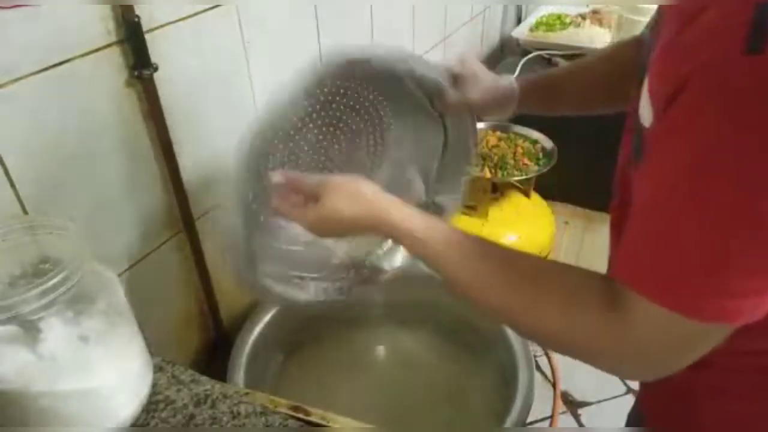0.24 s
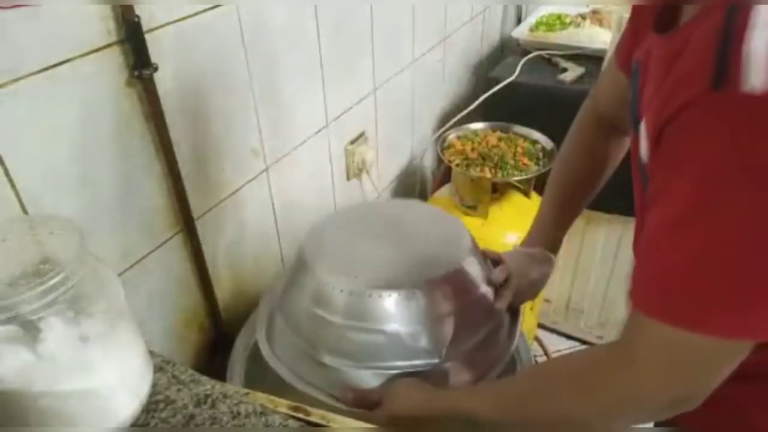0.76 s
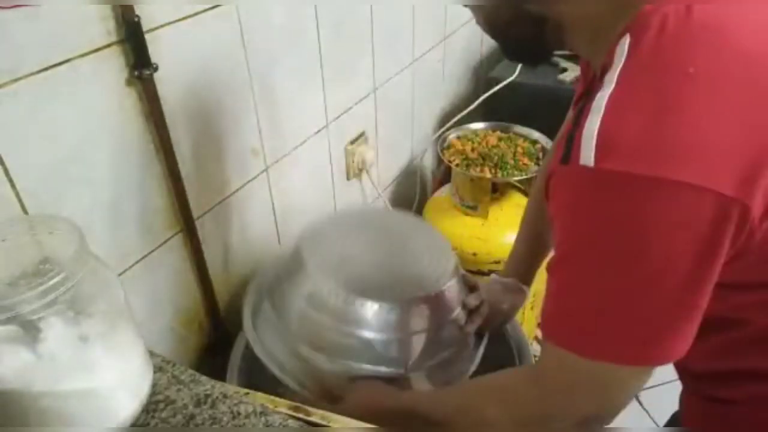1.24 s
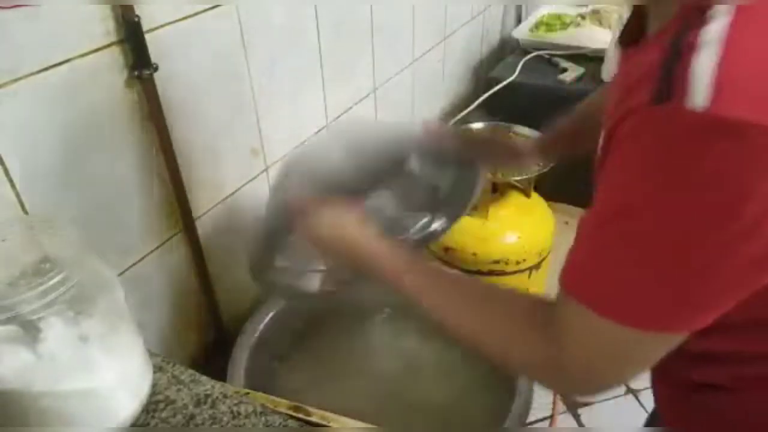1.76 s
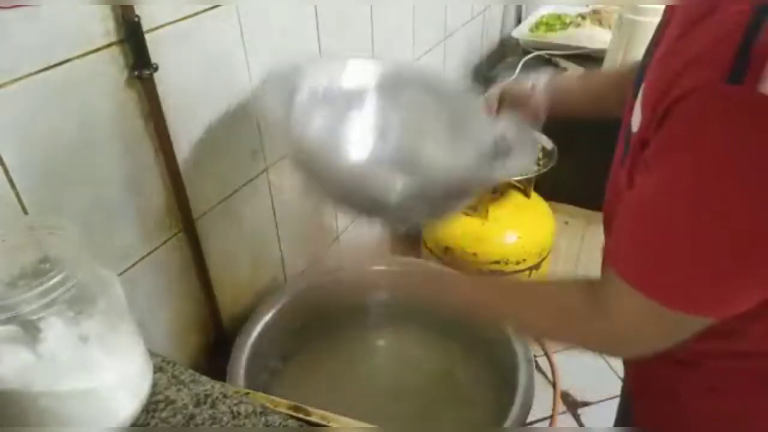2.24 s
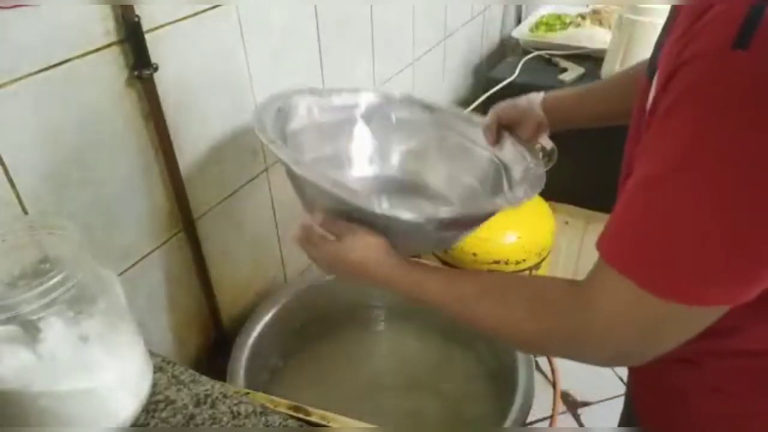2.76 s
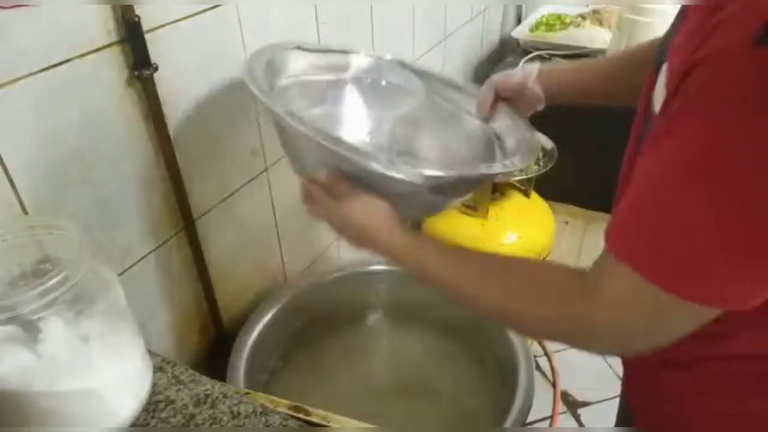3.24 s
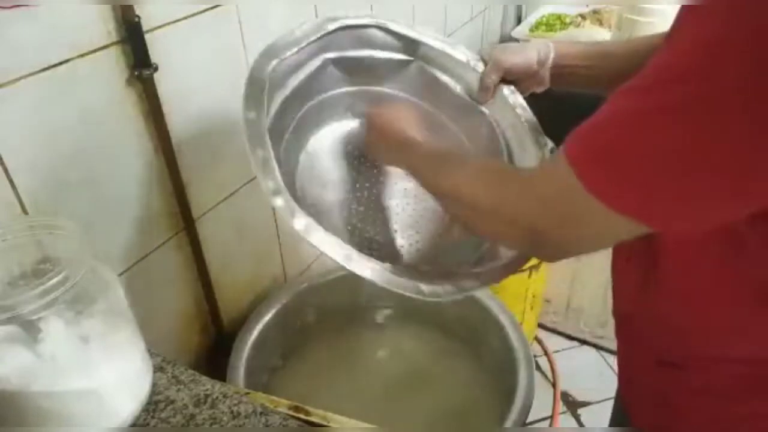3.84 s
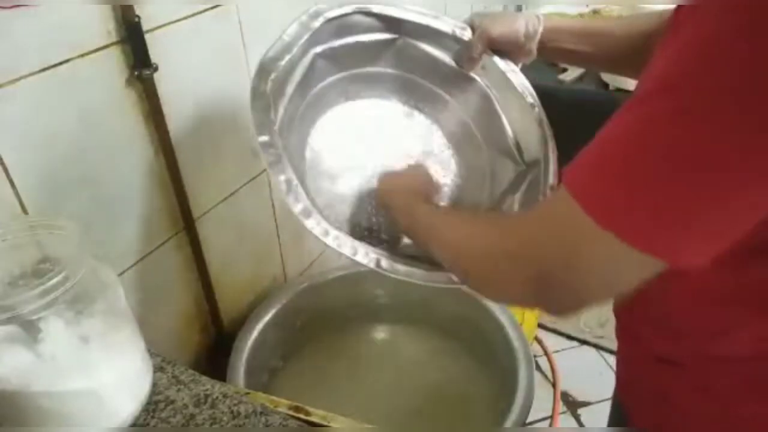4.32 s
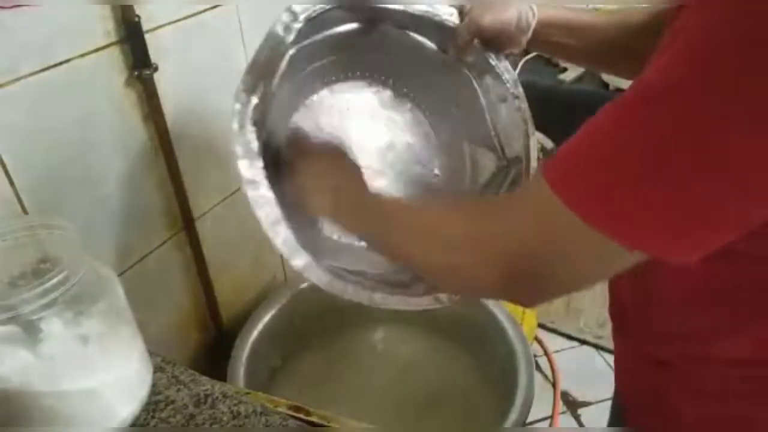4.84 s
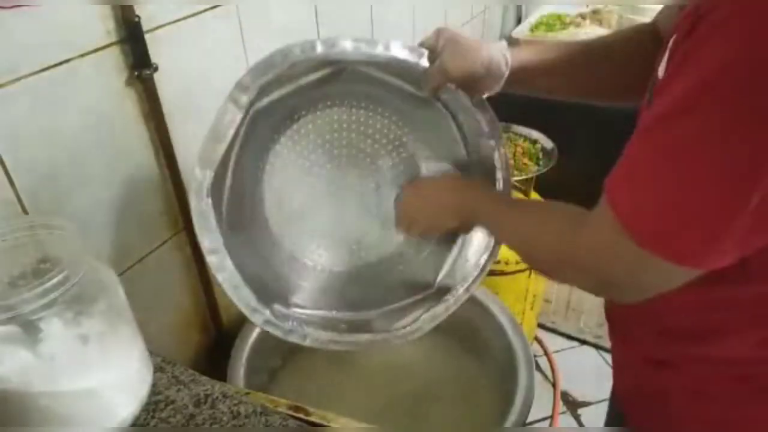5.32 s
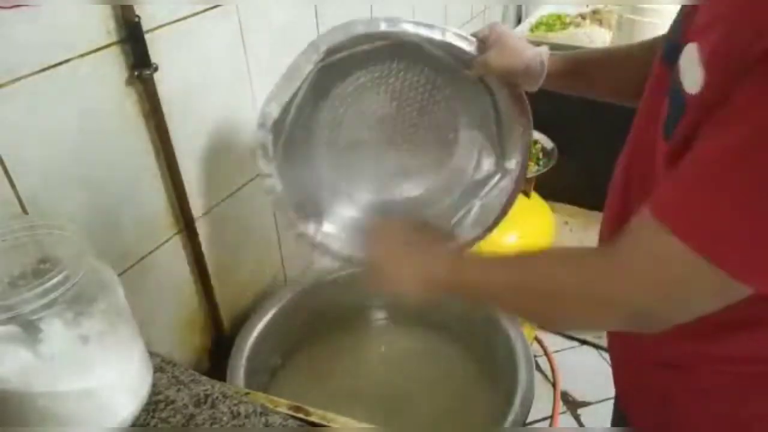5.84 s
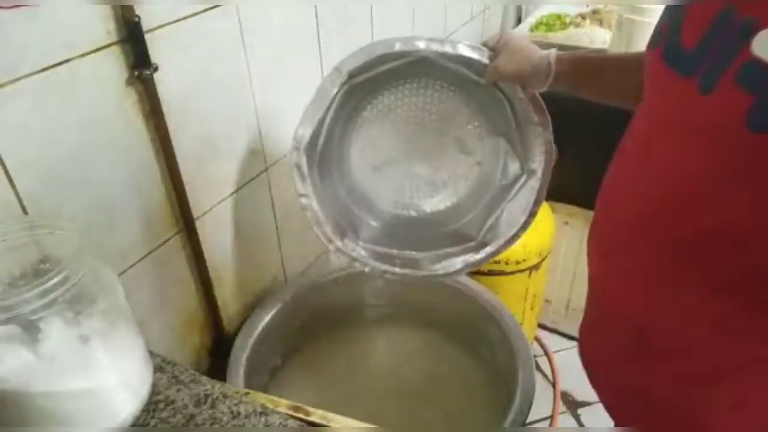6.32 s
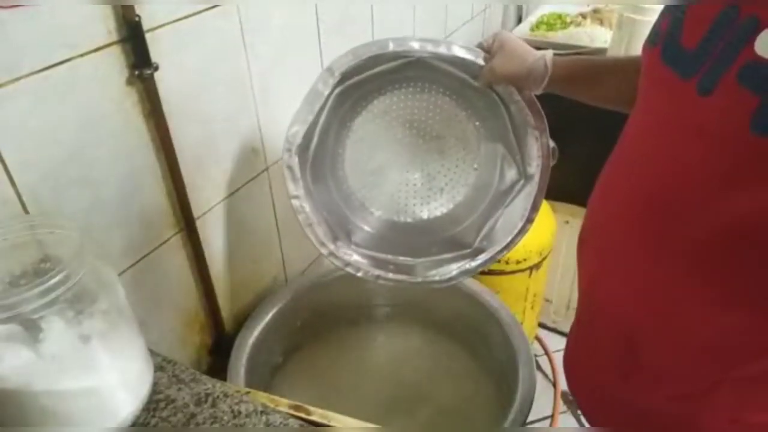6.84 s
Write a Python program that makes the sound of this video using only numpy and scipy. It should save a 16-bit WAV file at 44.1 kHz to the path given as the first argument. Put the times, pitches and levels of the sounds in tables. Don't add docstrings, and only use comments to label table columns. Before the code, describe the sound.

A low extractor fan hum with airy rush and a thin wavering whine fills a tiled kitchen. A hand rubs a thin metal strainer, then it bangs twice on a steel pot rim. Three harder hand slaps follow, bright and buzzing, with short tiled echo. Wiping scrapes and small taps finish. Close stereo phone pickup distorts on the clangs and ducks the hum afterwards.

```python
import sys
import numpy as np
from scipy import signal
from scipy.fft import rfft, irfft
from scipy.io import wavfile
from scipy.ndimage import uniform_filter1d

SR = 44100
rng = np.random.default_rng(int(sys.argv[2]) if len(sys.argv) > 2 else 0)


def to_linear_factor(level_db):
    exponent = np.asarray(level_db, float) / 20
    return 10 ** exponent


def put_to_file(sound):
    columns = np.atleast_2d(sound).T
    safe = np.clip(columns, -1, 1)
    whole_steps = np.round(safe * 32767)
    wavfile.write(sys.argv[1], SR, whole_steps.astype(np.int16))


N = 312669
SECONDS = np.arange(N) / SR

# (time [s], crash [dB], chatter length [s], ring [dB], sent to room [dB], colour at 13 kHz [dB])
BLOWS = [
    (1.3837, -6.5, 0.11, -1.5, 0, -29),
    (1.7129, 1.5, 0.085, 6, -1, -33),
    (2.632, 4.5, 0.058, 5, -4, -20.5),
    (2.938, 7, 0.038, 1, -7.5, -24.5),
    (3.507, 2.5, 0.076, 2.5, -7.5, -26.5),
]
# (frequency [Hz], density [dB per Hz])
TAP_COLOUR = [(180, -32), (360, -14.5), (1770, -8.5), (3120, -18.5), (6230, -24), (13000, -34.5)]
# (frequency [Hz], likeness [-1..1])
ROOM_LIKENESS = [(60, 0.99), (170, 0.95), (510, 0.59), (1470, -0.0047), (4270, -0.14), (12400, 0.21)]


def in_time(rows):
    return np.interp(SECONDS, *np.transpose(rows))


def at_hz(points, hz):
    table_hz, values = np.transpose(points)
    return np.interp(np.log(hz + 1e-9), np.log(table_hz), values)


def rms_one(x):
    return x / np.sqrt(np.mean(x ** 2) + 1e-20)


def drift(rate):
    r = np.exp(-80 * np.pi * rate / SR)
    slow = signal.lfilter([1], [1, -2 * r, r * r], rng.standard_normal(N // 40 + 2002))[2000:]
    return np.interp(np.arange(N) / 40, np.arange(len(slow)), rms_one(slow - slow.mean()))


def coloured(white, spectrum, tilt_db=0, likeness=None):
    size = white.shape[-1]
    hz = np.arange(size // 2 + 1) * SR / size
    z = rfft(white) * to_linear_factor(at_hz(spectrum, hz) + tilt_db * np.log2((hz + 50) / 1000))
    if likeness:
        alike = np.clip(at_hz(likeness, hz), -1, 1)
        z = np.sqrt(1 + alike) * z[0] + np.sqrt(1 - alike) * z[1] * [[1], [-1]]
    return rms_one(irfft(z, size))


def add(out, x, s):
    i = round(s * SR)
    out[..., i:i + x.shape[-1]] += x[..., :N - i]


def tone(hz, level_db, lead, pan_db, beat=1):
    phase = 2 * np.pi * hz * SECONDS + rng.uniform(0, 2 * np.pi) + 0.072 * drift(3.3) + np.angle(beat)
    wave = np.sin(phase + [[lead / 2], [-lead / 2]])
    pan = to_linear_factor(np.array([[pan_db / 2], [-pan_db / 2]]))
    return np.sqrt(2) * to_linear_factor(level_db) * np.abs(beat) * wave * pan


def rushing_air():
    # (frequency [Hz], density [dB per Hz])
    air_colour = [(15, -50), (30, -16.5), (55, -22), (78, 0.5), (100, -7), (150, -19.5), (300, -20.5),
                  (620, -23), (1080, -16.5), (1450, -23.5), (1800, -23.5), (2600, -24), (6600, -38),
                  (13000, -33)]
    # (frequency [Hz], left-right likeness [-1..1])
    air_likeness = [(30, 0.97), (60, 1), (150, 0.91), (350, 0.84), (860, -0.73), (2100, -0.13),
                    (5100, 0.093), (12400, -0.41)]
    noise = coloured(rng.standard_normal((2, N)), air_colour, likeness=air_likeness)
    return noise * to_linear_factor(-31 + drift(4.5) / 2)


def blade_tones():
    # (time [s], level [dB])
    blade_level = [(0, -24), (.25, -31), (.75, -25), (1.2, -27.5), (2.2, -27.5), (3.3, -24), (4.4, -26.5),
                   (4.9, -24), (5.7, -26), (6.6, -22), (7.09, -26.5)]
    # (time [s], third [dB], fourth [dB])
    overtones = [(0, -40.5, -44), (.5, -38.5, -43.5), (1.0, -44, -42.5), (1.35, -40.5, -48),
                 (2.2, -48, -42.5), (2.6, -38.5, -43.5), (3.3, -40.5, -43.5), (4.0, -39.5, -44.5),
                 (4.6, -42.5, -44), (5.2, -38.5, -41), (5.8, -41.5, -41.5), (6.35, -37.5, -41),
                 (6.7, -42.5, -39.5), (7.09, -39.5, -41)]
    hum = 1 + to_linear_factor(-6) * np.exp(2j * np.pi * 2.4 * (SECONDS - 5.9))
    out = tone(96.8, in_time(blade_level), -0.063, 0.5, hum)
    s, third_db, fourth_db = np.transpose(overtones)
    out += tone(290.7, np.interp(SECONDS, s, third_db) + 0.64 * drift(3.8), .1, .7)
    out += tone(387.6, np.interp(SECONDS, s, fourth_db) + 1.9 * drift(2.9), 0.62, -.5)
    return out


def motor_whine():
    # (time [s], level [dB])
    whine_level = [(0, -32), (.45, -36.5), (.56, -29.5), (1.1, -41), (1.35, -29.5), (2.0, -33), (2.5, -33),
                   (3.3, -29.5), (4.0, -35), (4.12, -27), (4.7, -32), (4.9, -28.5), (5.36, -37), (5.6, -26),
                   (6.11, -23.5), (6.14, -31), (6.17, -26), (6.32, -32), (6.52, -23), (6.6, -28),
                   (6.63, -30), (6.7, -30.5), (6.73, -39), (6.76, -30), (6.83, -31), (6.87, -38),
                   (6.92, -33.5), (7.09, -27.5)]
    return tone(1067.2, in_time(whine_level) + 1.35 * drift(19), -2.597, 2)


def fan():
    # (frequency [Hz], rms level [dB], left leads by [rad], left-right [dB], flutter [dB])
    steady_tones = [(73, -44, -.1, .5, 3), (80, -42, -.1, .5, 3), (121, -48, 0, 0, 3),
                    (145.5, -50, 0, 0, 3), (193.8, -40, -.05, 0, .8), (266.5, -50, 0, 0, 2.5),
                    (581.4, -58, 1.1, 0, 2.5), (1019, -53, 2.9, 0, 2.5), (1043, -54, 2, 3, 2.5),
                    (1091, -53, 1.5, 0, 2.5), (1115, -50, 2, 0, 2.5), (1186, -53, 2, 0, 2.5),
                    (1305, -58, 1, 0, 2.5), (1660, -56, -2, 0, 2.5), (1731, -55, -1.5, 3, 2.5),
                    (1754.5, -47, -1.5, 3, 2.5), (1803, -58, 1, 0, 2.5), (1874, -58, 1, 0, 2.5),
                    (1897, -54, 1.5, 0, 2.5), (1921, -51, 1.5, -2, 2.5)]
    out = blade_tones() + motor_whine() + rushing_air()
    for hz, level_db, lead, pan_db, flutter_db in steady_tones:
        out += tone(hz, level_db + flutter_db * drift(3.7), lead, pan_db)
    return out


def kitchen(x):
    # (frequency [Hz], decay by 60 dB [s])
    room_t60 = [(60, 0.32), (160, 0.44), (1100, 0.52), (3000, 0.47), (7500, 0.45), (13000, 0.42)]
    t, tail = np.arange(SR) / SR, 0
    edges = 45 * 2 ** np.arange(0, 8.6, .5)
    noise = coloured(rng.standard_normal((2, SR)), [(20, 0), (20000, 0)], likeness=ROOM_LIKENESS)
    for low, high in zip(edges, edges[1:]):
        band = signal.sosfilt(signal.butter(2, [low, high], "band", fs=SR, output="sos"), noise)
        tail = tail + band * to_linear_factor(-60 * t / at_hz(room_t60, np.sqrt(low * high)))
    tail = tail * np.minimum(t / 0.021, 1)
    return signal.fftconvolve(x[None], tail / np.sqrt(np.sum(tail[0] ** 2)), axes=1)[:, :N]


def rubbing():
    # (time of peak [s], level [dB], rise [s], fall [s])
    strokes = [(0.098, -17, 0.041, 0.043), (0.156, -17.5, 0.041, 0.077), (0.241, -17.5, 0.062, 0.082),
               (0.29, -20.5, 0.032, .11), (0.816, -41, .05, 0.078), (1.086, -20.5, 0.17, 0.17),
               (1.8, -18, 0.067, 0.032), (2.864, -10.5, 0.098, 0.051), (2.96, -10.5, 0.11, 0.14),
               (3.17, -14, 0.26, 0.11), (3.81, -19, 0.23, 0.1), (4.06, -26.5, 0.014, 0.048),
               (4.14, -28, 0.018, 0.057), (4.22, -25, 0.16, 0.37), (4.483, -12.5, 0.0082, 0.03),
               (4.53, -27.5, 0.044, 0.43), (4.93, -26.5, 0.11, 0.22), (5.04, -26.5, 0.027, 0.068),
               (5.15, -19.5, 0.0059, 0.075), (5.26, -31, .06, 0.092), (5.8, -30.5, 0.64, 0.14),
               (5.92, -32.5, 0.072, 0.14), (6.27, -19.5, 0.015, 0.024), (6.29, -30, .03, 0.1)]
    # (frequency [Hz], density [dB per Hz])
    rub_colour = [(240, -44), (400, -13), (1200, -10), (2500, -7.5), (4000, -8.5), (6400, -5), (9000, -8),
                  (13000, -7)]
    unevenness_db = 1.4 * np.minimum(rng.exponential(1, N), 4) + 0.85 * drift(31)
    grains = rng.standard_normal((2, N)) * to_linear_factor(unevenness_db)
    t, power = SECONDS[::32], 0
    for s, level_db, rise_s, fall_s in strokes:
        away = np.maximum((s - t) / max(rise_s, .003), (t - s) / max(fall_s, .003))
        power = power + to_linear_factor(2 * (level_db - 15 * away))
    power = np.interp(SECONDS, t, power) * to_linear_factor(2 * 0.47 * drift(55))
    power = power + to_linear_factor(2 * -42)
    return np.sqrt(power) * coloured(grains, rub_colour, likeness=ROOM_LIKENESS)


def chatter(spectrum, length_s, tilt_db=0, crack=0.87, crack_s=0.0078):
    t = np.arange(SR // 2) / SR
    bumps = np.repeat(rng.standard_normal(len(t) // 50), 50)
    uneven = rng.standard_normal((2, len(t))) * to_linear_factor(2.25 * bumps)
    buzz = coloured(uneven, spectrum, tilt_db, ROOM_LIKENESS)
    bright = signal.sosfilt(signal.butter(1, 2500, "high", fs=SR, output="sos"), buzz)
    dying_buzz = buzz * np.exp(-(t / length_s) ** 2)
    sharp_crack = 3 * crack * bright * np.exp(-t / max(crack_s, .001))
    return np.minimum(t / 0.001, 1) * (dying_buzz + sharp_crack)


def ring(modes):
    t = np.arange(int(SR * min(.6, max(m[1] for m in modes)))) / SR
    ending = np.minimum((t[-1] - t) / 0.088, 1)
    out = 0
    for hz, t60, swell, level_db in modes:
        rise = np.sin(np.pi / 2 * np.minimum(t / max(swell, .001), 1)) ** 2
        shape = rise * to_linear_factor(-60 * np.maximum(t - swell, 0) / t60)
        flicker_db = 4 * np.interp(t * 60, np.arange(80), rng.normal(0, 1, 80))
        shape = shape * to_linear_factor(min(hz / 400, 1) ** 2 * (flicker_db - 6 * (t / .2) ** 2))
        split = .018 * rng.normal(0, 1, (4, 1))
        phase = rng.uniform(0, 2 * np.pi, (2, 4, 1))
        angle = 2 * np.pi * hz * (1 + split - split[0]) * t + phase[0]
        weight = [1] + 3 * [0.031 + 1.02 * min(hz / 800, 1)]
        lead = np.clip(hz / 800, .34, 1) ** 2 * phase[1]
        stereo = np.array([weight @ np.sin(angle), weight @ np.sin(angle + lead)])
        out = out + to_linear_factor(level_db) * shape * ending * stereo
    return out


def pings(dry, wet):
    # (time [s], frequency [Hz], decay by 60 dB [s], swell [s], level [dB])
    panels = [(1.168, 595, .12, .008, -33.5), (3.14, 1340, .4, 0.044, -32.5), (3.76, 1970, 0.17, .03, -36),
              (3.765, 3730, .15, .03, -46), (3.78, 4200, .12, 0.024, -44), (5.055, 1910, .07, .002, -38),
              (5.055, 2550, .07, .002, -34), (5.149, 2120, .08, 0.0018, -30), (5.149, 5400, .08, .002, -31),
              (5.15, 6180, .12, .002, -34), (5.246, 3040, 0.084, 0.0022, -35),
              (5.245, 3560, .09, .002, -37), (5.245, 4200, 0.084, .002, -42), (5.247, 5770, .05, .002, -41),
              (6.262, 1430, .1, .003, -38)]
    for s, *mode in panels:
        ping = ring([mode])
        add(dry, ping, s)
        add(wet, to_linear_factor(-5.5) * ping[0], s)


def taps(dry, wet):
    # (time [s], level [dB], chatter length [s], brightness [dB per octave], ring [dB])
    touches = [(0.816, -32, 0.0058, 9, -43), (1.178, -33, 0.025, 0, -36.5), (4.06, -29.5, 0.028, -5.5, -35),
               (4.4751, -18.5, 0.018, -7, -20.5), (4.8, -29.5, 0.044, 2.5, -40),
               (5.054, -39, 0.027, 0, -41), (5.148, -24.5, 0.02, -3, -25), (5.245, -33, .012, 2.5, -43),
               (5.033, -34.5, .01, 4, -45), (5.362, -43, .01, -1, -52), (6.26, -32.5, 0.027, 6, -46)]
    # (frequency [Hz], level [dB], decay by 60 dB [s])
    held_bowl = [(518, 8.5, 0.14), (606, 8, 0.087), (843, -1, 0.14), (1295, -0.5, 0.22), (1680, -2.5, 0.35),
                 (1830, -5, 0.14), (2520, -15, .1), (2970, 3, .08)]
    for s, level_db, length_s, tilt_db, ring_db in touches:
        damped = [(hz, min(t60, .3), .004, mode_db - 16 + rng.normal(0, 0.52))
                  for hz, mode_db, t60 in held_bowl]
        rattle = to_linear_factor(level_db) * chatter(TAP_COLOUR, length_s, tilt_db)
        for part in rattle, to_linear_factor(ring_db) * ring(damped):
            add(dry, part, s)
            add(wet, part[0], s)


def rim_modes(knock):
    # (frequency [Hz], decay by 60 dB [s], swell [s], first knock [dB], second knock [dB])
    rim = [(77.5, 0.74, 0.03, -13, -12), (131, 0.4, 0.031, -29, -18), (211.3, 0.13, 0.021, -4, -3.5),
           (241, 0.27, 0.034, -19, -18), (276.3, 0.08, 0.052, -8, -12), (457, 0.98, 0.03, -34, -32),
           (622, 0.6, 0.046, -21, -34), (736, 0.66, 0.0089, -22, -19.5), (787, 0.26, 0.0041, -16, -20),
           (866, 0.29, 0.013, -31, -26), (1175, 0.24, 0.025, -10, -17.5), (1130, 0.35, 0.018, -17, -18),
           (1350, 0.62, 0.033, -31, -26), (1670, 1, 0.01, -24, -32), (1940, 0.6, 0.044, -21, -35),
           (2980, 0.76, 0.024, -26, -26), (163.5, .3, .03, -21, -17), (346, 0.27, 0.059, -25, -20),
           (568, 0.036, .002, -9.5, -17), (1780, 0.4, 0.018, -33, -27), (2090, .3, 0.018, -27, -30),
           (2180, 0.57, .016, -20, -30), (2430, 0.65, 0.013, -32, -32), (2640, 0.53, 0.014, -28, -23),
           (3160, 0.43, .016, -30, -34), (3220, 0.93, 0.018, -32, -32)]
    return [(m[0], m[1], m[2], m[3 + knock]) for m in rim]


def bowl_modes(slap):
    # (frequency [Hz], decay by 60 dB [s], first [dB], second [dB], third slap [dB])
    bowl = [(77.1, 0.79, -15, -9, -16.5), (84.8, 0.33, -24, -26, -9), (133, 0.33, -40, -15, -14),
            (285, 0.53, -19.5, -36, -40), (434.3, 0.35, -27, -41, -13), (455, 0.51, -21, -10.5, -28),
            (510.5, 0.5, -16.5, -9, -16), (603, 0.49, -11, -13, -28), (754, 0.23, -32, -34, -27),
            (855, 0.36, -25, -14, -15.5), (1114, 0.25, -9.5, -35, -35), (1220, 0.15, -36, -14, -7),
            (1340, 0.73, -26, -18, -23), (1870, 0.28, -34, -26, -28), (2116, 0.32, -25, -21, -33),
            (2010, 0.48, -19, -11.5, -14.5), (2590, 0.55, -24, -26, -24), (2765, 0.55, -15.5, -23, -26),
            (2950, 0.51, -17, -21, -40), (3190, 0.38, -20.5, -26, -42), (1446, .3, -26, -34, -26),
            (1645, 0.51, -28, -30, -35), (2205, .4, -23, -15, -30), (2460, 0.57, -36, -21, -22),
            (3360, 0.23, -37, -32, -24), (3570, .38, -26, -30, -27), (3765, .4, -36, -30, -28),
            (4000, 0.4, -30, -34, -24), (4120, 0.17, -42, -19, -32), (4200, .3, -34, -23, -33),
            (4300, .2, -35, -32, -22), (4460, .3, -36, -29, -39), (4840, .35, -38, -28, -32),
            (5140, .25, -36, -32, -35), (5400, 0.27, -37, -32, -29)]
    climb_s = [0.056, .01, 0.0096]
    modes = []
    for m in bowl:
        swell = max(.008, 5.4 / m[0] - .01, climb_s[slap] * min(m[0] / 2500, 1) ** 2)
        modes.append((m[0], m[1], swell, m[2 + slap]))
    return modes


def blows(dry, wet):
    # (frequency [Hz], density [dB per Hz])
    crashes = [
        [(35, -46), (60, -11), (175, -10.5), (271, -1), (492, -17.5), (793, -13), (929, -22.5), (1160, -11),
         (1500, -20), (2060, -20), (6900, -27.5)],
        [(35, -39), (60, -7), (165, -18), (271, -3), (324, -11.5), (718, -14.5), (929, -20), (1130, -13),
         (1530, -19), (1940, -15.5), (6900, -27)],
        [(35, -24), (60, 4.5), (175, -11), (290, -9), (370, -8), (610, -8), (1090, -6), (1700, -10.5),
         (2250, -9.5), (2600, -4.5), (3100, -7.5), (3450, -12.5), (4000, -18.5), (6900, -16)],
        [(35, -48), (60, -16), (91, 5), (186, -12.5), (277, -11), (338, -16.5), (492, -7), (1200, -10),
         (1560, -19.5), (2320, -14), (6900, -20.5)],
        [(35, -37), (60, -9.5), (86, 1.5), (182, -18.5), (288, -13), (331, -11), (650, -15.5), (858, -10),
         (1050, -18.5), (1250, -12), (6900, -24)],
    ]
    # (crack strength [ratio], crack decay [s], graze ahead by [s], graze [dB])
    contacts = [(1.7, 0.0026, .003, -23), (0.93, 0.0076, 0.0023, -16), (1.06, 0.0091, 0.0028, -30),
                (0.91, 0.0093, 0.0011, -12), (1.76, 0.0075, 0.006, -21)]
    for k, (s, crash_db, length_s, ring_db, room_db, top_db) in enumerate(BLOWS):
        modes = rim_modes(k) if k < 2 else bowl_modes(k - 2)
        crack, crack_s, graze_s, graze_db = contacts[k]
        colour = crashes[k] + [(13000, top_db)]
        crash = to_linear_factor(crash_db) * chatter(colour, length_s, crack=crack, crack_s=crack_s)
        tones = to_linear_factor(ring_db) * ring(modes)
        add(dry, to_linear_factor(graze_db) * chatter(TAP_COLOUR, 0.0046, crack=0), s - graze_s)
        add(dry, crash, s)
        add(dry, tones, s)
        add(wet, to_linear_factor(room_db) * crash[0], s)
        add(wet, to_linear_factor(room_db - 8) * tones[0], s)


def strainer():
    dry, wet = np.zeros((2, N)), np.zeros(N)
    pings(dry, wet)
    taps(dry, wet)
    blows(dry, wet)
    return dry, wet


def scene():
    dry, wet = strainer()
    return fan() + kitchen(wet) + rubbing() + dry * to_linear_factor(np.array([[.4], [-.4]]))


def gain_control_db():
    ducked_db = [-9, -12.5, -12.5, -9.5, -8]
    rest_db, settle_s, hold_s, release_s = -0.49, 0.095, 1.124, 0.73
    ducks = 0
    for step, blow in zip(np.diff([rest_db] + ducked_db), BLOWS):
        ducks = ducks + step * (1 - np.exp(-np.maximum(SECONDS - blow[0], 0) / settle_s))
    recovered = np.clip((SECONDS - BLOWS[-1][0] - hold_s) / release_s, 0, 1)
    return rest_db + ducks * (1 - recovered)


def weak_bins_dropped(x, from_hz=1900, share=.65, patchy_db=2.2, holes=.1):
    hz, _, z = signal.stft(x, SR, nperseg=1024)
    near = np.sqrt(uniform_filter1d(np.abs(z) ** 2, size=9, axis=1))
    cells = (len(hz) // 3 + 1, z.shape[2] // 3 + 1)
    jumps = to_linear_factor(patchy_db * rng.standard_normal(cells) - 22 * (rng.random(cells) < holes))
    jumps = np.kron(jumps, np.ones((3, 3)))[:len(hz), :z.shape[2]]
    keep = np.where(hz[:, None] > from_hz, (np.abs(z) > share * near) * jumps, 1)
    bright_db = 10 * np.log10(np.sum(np.abs(z[0, hz > from_hz]) ** 2, axis=0) + 1e-20)
    attack = np.diff(bright_db, prepend=0) > 6
    keep[..., attack | np.roll(attack, -1)] = 1
    top_db = np.interp(hz, [7050, 7250, 7500, 7700, 11800, 13000], [0, -12, -12, -10, -10, -14])
    return signal.istft(z * keep * to_linear_factor(top_db)[:, None], SR, nperseg=1024)[1][:, :N]


def band_limit(x):
    return signal.sosfilt(signal.butter(12, 12850, fs=SR, output="sos"), x)


def record(dry):
    x = dry * to_linear_factor(gain_control_db())
    hiss = coloured(rng.standard_normal((2, N)), [(2000, -36), (6000, -8), (13000, 2)])
    x = x + to_linear_factor(-55.5) * hiss
    x = x / (1 + np.abs(x / 1.15) ** 4) ** .25
    return band_limit(weak_bins_dropped(x))


dry = scene()
out = record(dry)
put_to_file(out)
```